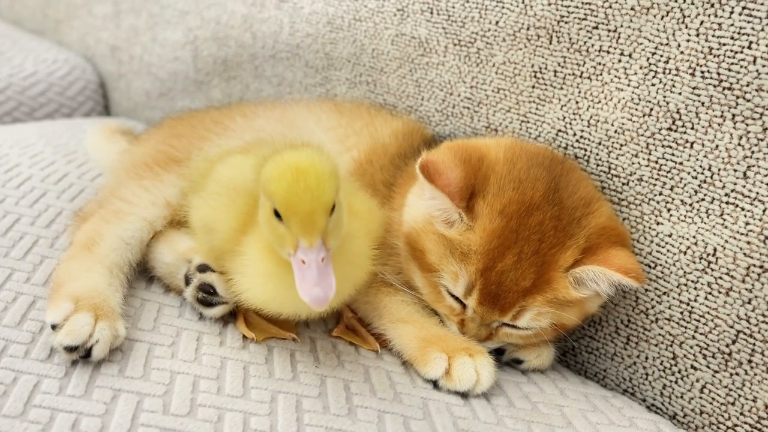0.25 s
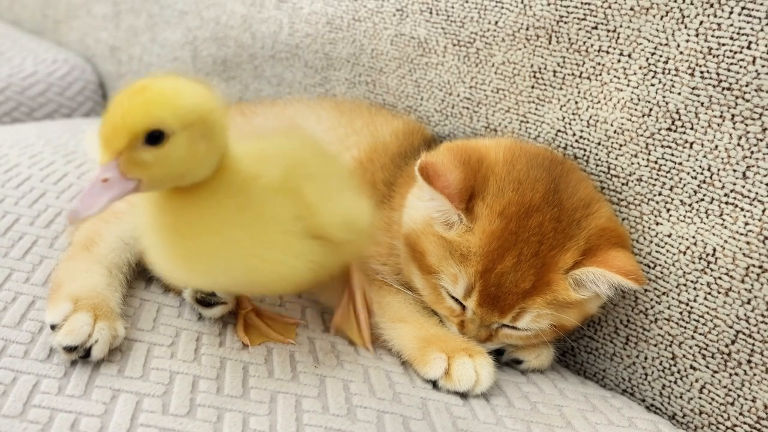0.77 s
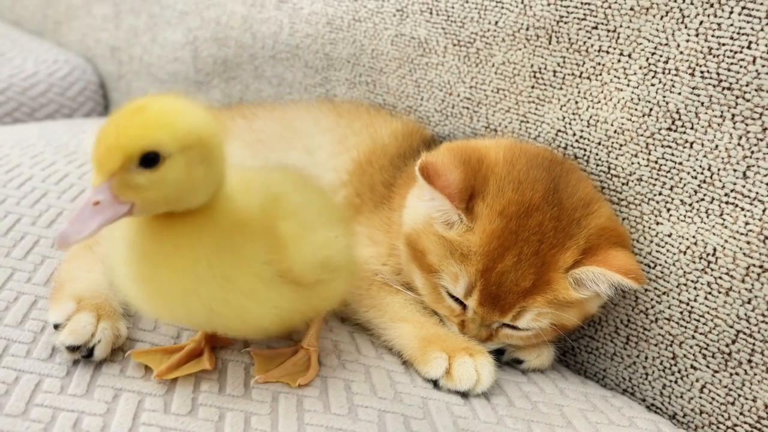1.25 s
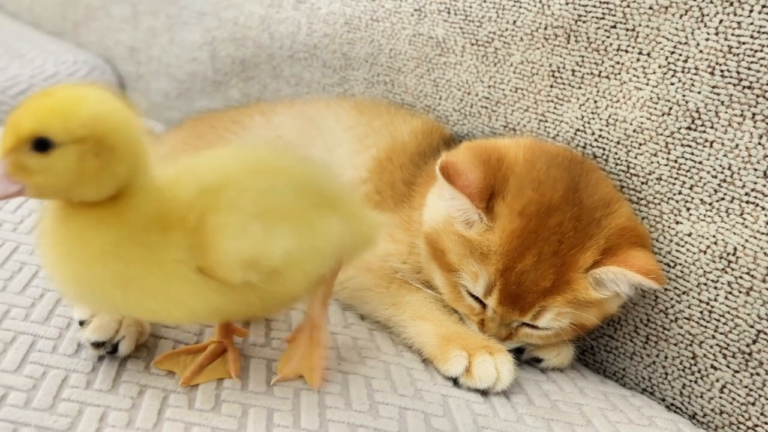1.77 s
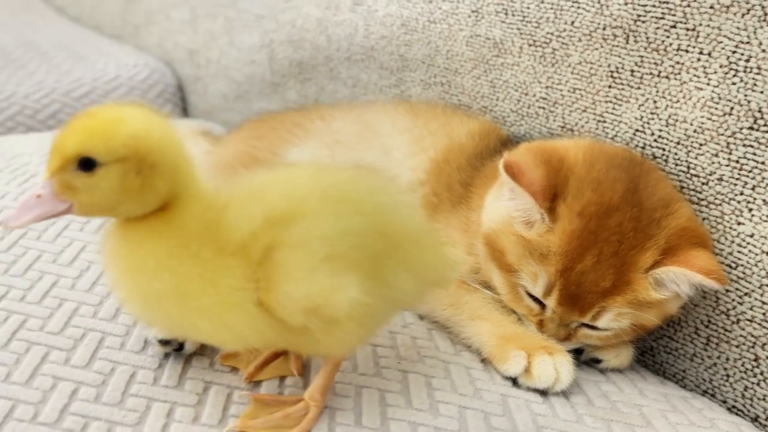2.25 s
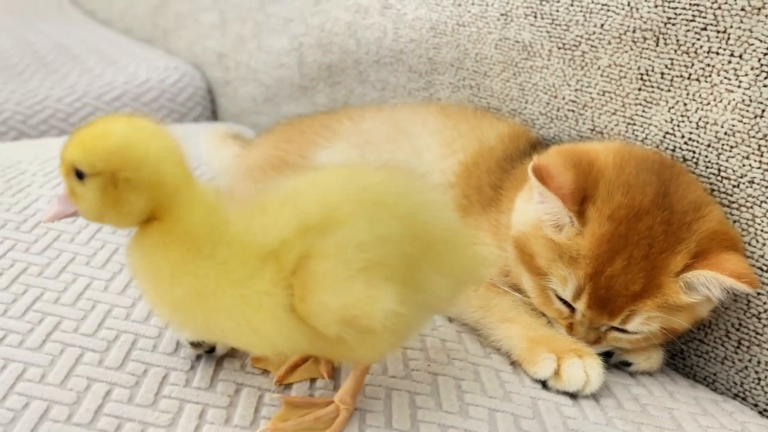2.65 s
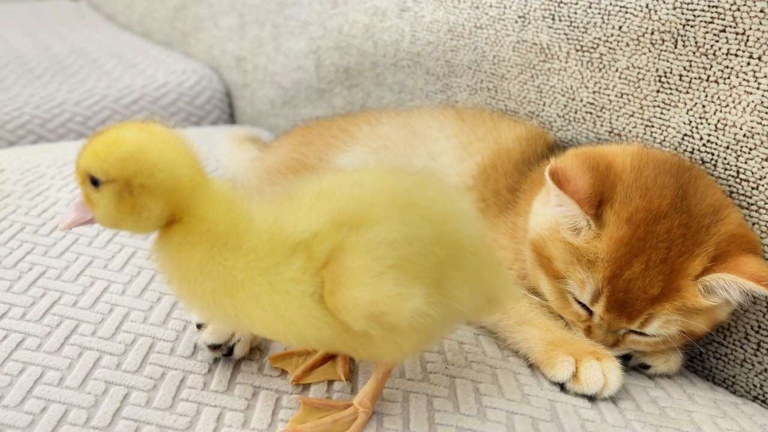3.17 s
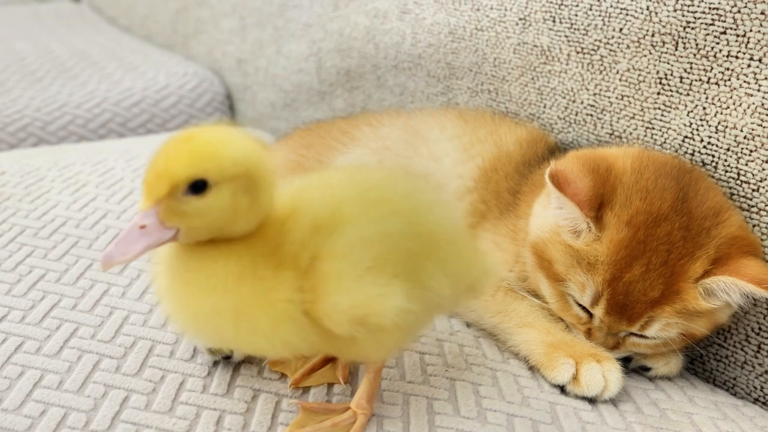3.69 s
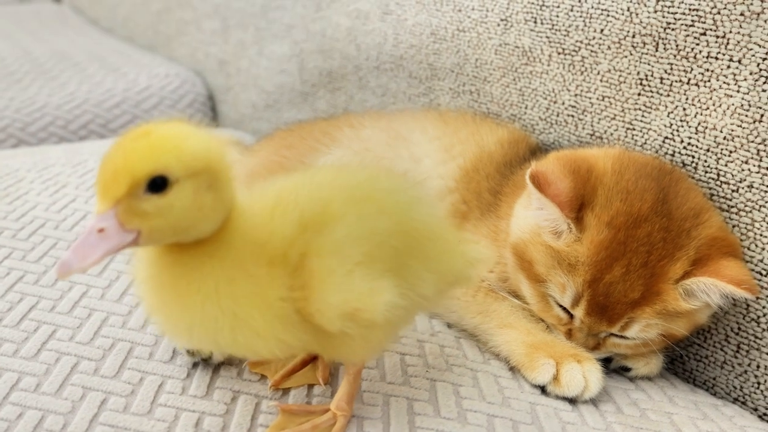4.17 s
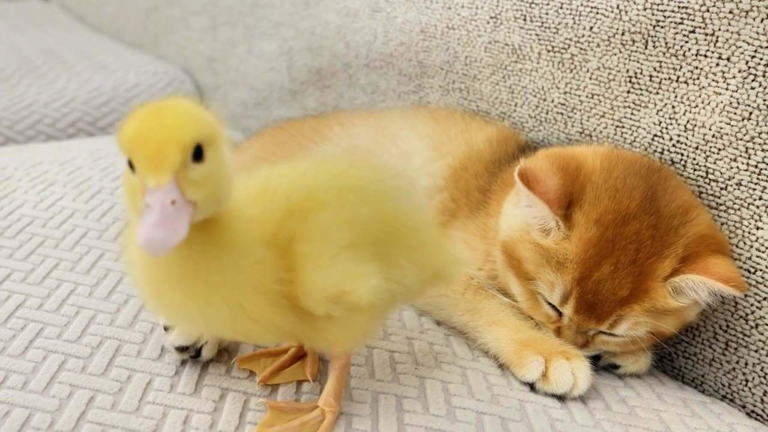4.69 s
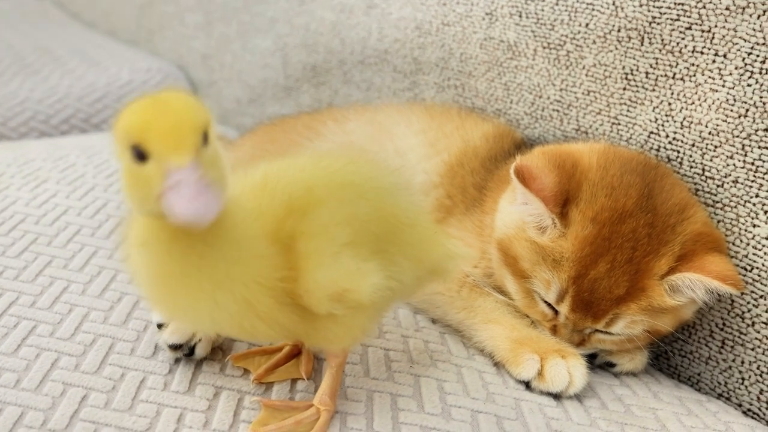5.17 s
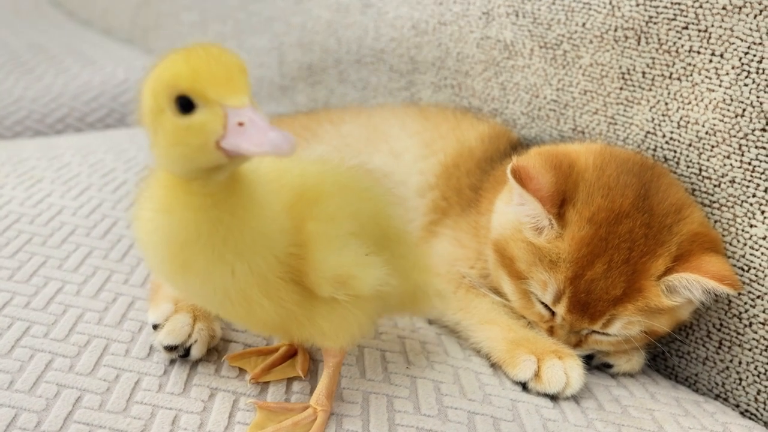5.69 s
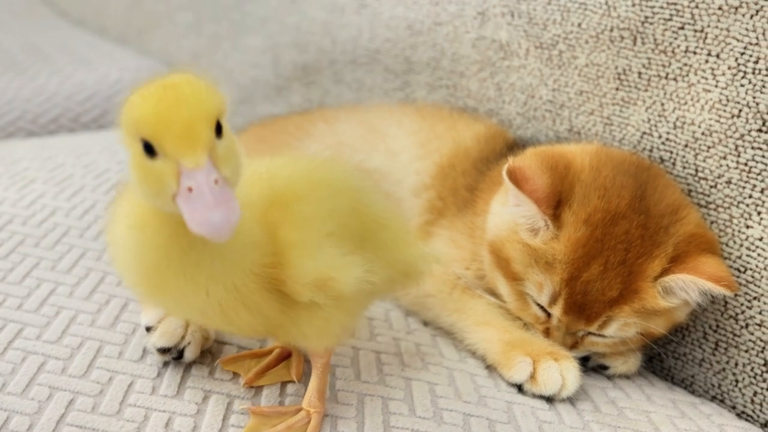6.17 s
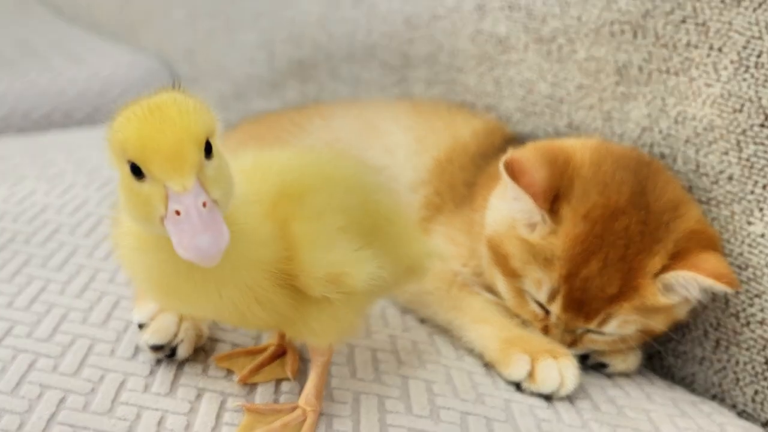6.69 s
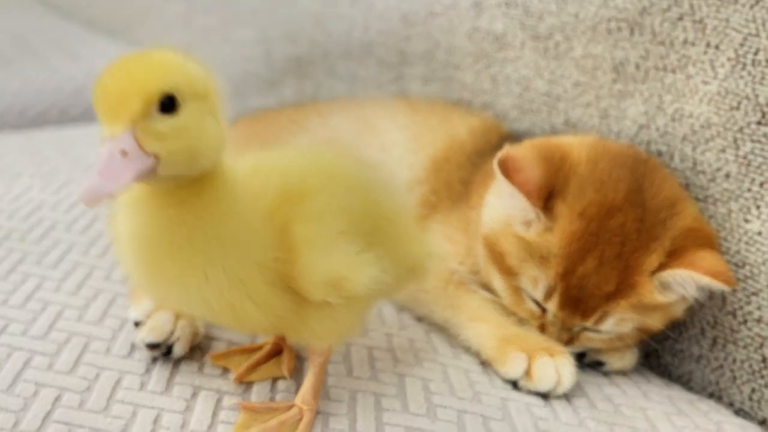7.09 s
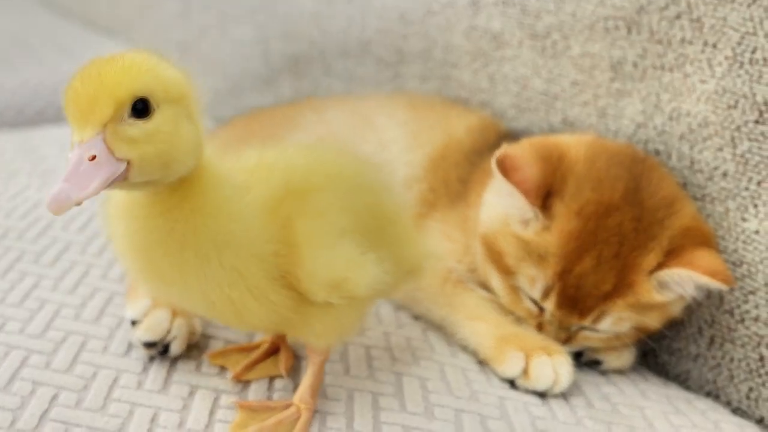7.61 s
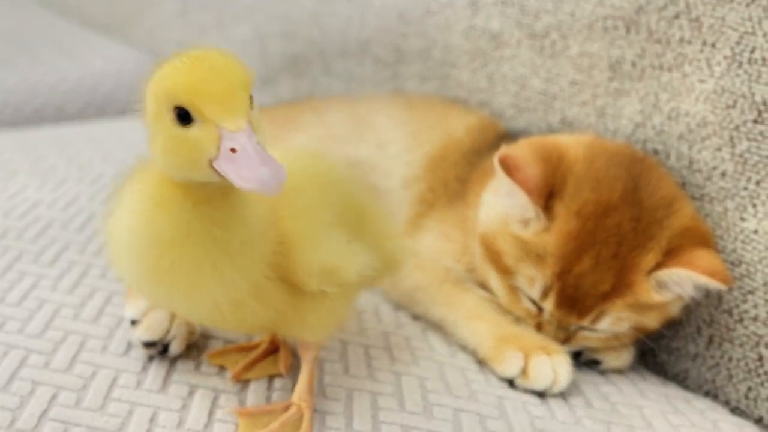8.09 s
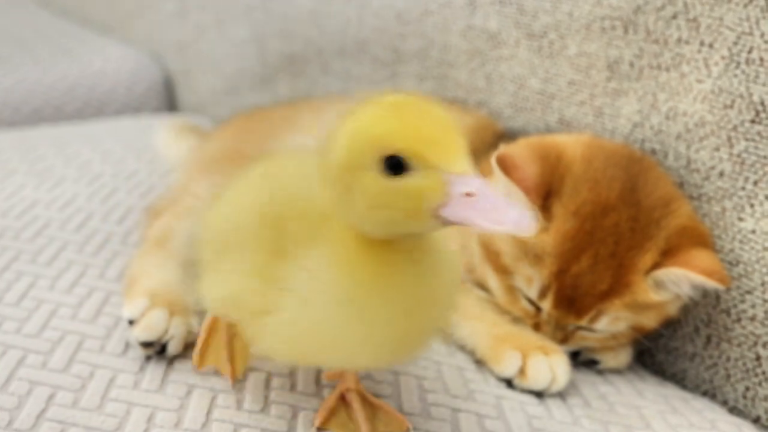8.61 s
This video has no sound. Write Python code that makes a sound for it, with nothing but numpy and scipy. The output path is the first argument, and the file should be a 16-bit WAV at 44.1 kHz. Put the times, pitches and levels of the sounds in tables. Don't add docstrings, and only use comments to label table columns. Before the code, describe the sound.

A close duckling peeps steadily in short high whistles, about five a second, over a faint kitten purr, with soft footsteps on a sofa cushion.

```python
import sys
import numpy as np
from scipy import signal
from scipy.fft import rfft, irfft
from scipy.io import wavfile

SR = 44100
rng = np.random.default_rng(int(sys.argv[2]) if len(sys.argv) > 2 else 0)


def wav_record(signal):
    frames = np.transpose(np.atleast_2d(signal))
    bounded = np.clip(frames, -1, 1)
    quanta = np.round(bounded * 32767).astype(np.int16)
    wavfile.write(sys.argv[1], SR, quanta)


def boost(x):
    u = np.asarray(x, float) / 20
    return 10 ** u


N = 390268

# start_s, length_s, peak_db, crest_hz, hump_hz
PEEPS = [(0.1043, 0.072, -17.5, 3458, 3210), (0.2921, 0.072, -17, 3413, 3275),
         (0.4859, 0.073, -17, 3405, 3215), (0.6696, 0.074, -18.5, 3445, 3120),
         (0.8605, 0.074, -20.5, 3286, 3040), (1.0661, 0.066, -20.5, 3257, 3070),
         (1.2518, 0.075, -19, 3266, 3014), (1.455, 0.073, -18.5, 3323, 3010),
         (1.6725, 0.069, -19.5, 3377, 3000), (1.859, 0.071, -21, 3230, 2925),
         (2.0556, 0.074, -21.5, 3350, 3046), (2.273, 0.074, -21, 3320, 2960),
         (3.6012, 0.026, -28.5, 3060, 2460), (3.7033, 0.049, -23.5, 3367, 2680),
                (3.916, 0.061, -21.7, 3375, 3085), (4.041, 0.06, -21.5, 3290, 2870),
                (4.2401, 0.067, -20.5, 3320, 3104), (4.4254, 0.07, -20.5, 3340, 3120),
                (4.6122, 0.077, -20.5, 3234, 3160), (4.789, 0.074, -18.5, 3385, 3166),
                (4.9811, 0.072, -18, 3448, 3244), (5.1638, 0.072, -18, 3420, 3185),
                (5.3369, .0781, -17.5, 3450, 3310), (5.5289, 0.073, -15.5, 3450, 3181),
                (5.7132, 0.077, -16, 3430, 3178), (5.9007, 0.076, -15.5, 3507, 3223),
                (6.0816, 0.078, -16.5, 3450, 3224), (6.274, 0.075, -16, 3480, 3264),
                (6.4711, 0.074, -15.5, 3403, 3190),
         (6.7688, 0.064, -18, 3389, 2836), (7.1479, 0.058, -19.5, 3514, 2712),
              (7.3314, 0.071, -18.5, 3350, 3144), (7.529, 0.068, -18.5, 3410, 3020),
              (7.7373, 0.072, -18.5, 3374, 3030), (7.9502, 0.07, -18, 3340, 3050),
              (8.1272, 0.074, -18, 3316, 3050), (8.3232, 0.072, -18, 3270, 3000),
              (8.533, 0.072, -21.5, 3160, 2823), (8.7557, .0709, -18, 3460, 2800)]
# time_s, dip_hz, split_hz (second membrane above first), twin_db, scoop_hz (rise into crest)
MEMBRANE_TENSION = [(.1, 2892, 190, -12.5, 157), (.6, 2870, 202, -7.5, 82), (1.0, 2689, 338, -9, -1),
                    (1.9, 2698, 351, -7.5, 41), (2.1, 2735, 265, -8.5, 68.5), (3.6, 2660, 302, -28, -49),
                    (3.9, 2594, 345, -10, 0), (4.04, 2818, 365, -11, -10), (4.25, 2685, 368, -8.5, 73),
                    (4.8, 2740, 354, -6, 80), (5.4, 2865, 331.5, -8.5, 22), (6.5, 2822, 343, -5.5, 33),
                    (7.15, 2586, 443, -10, -43), (7.35, 2709, 411, -6, 4), (7.95, 2655, 382, -7, -22),
                    (8.15, 2748, 362, -5, 6), (8.53, 2565, 440, -6, -16), (8.76, 2660, 325, -7.5, 1.5)]
# time_s, bright_db (4th overtone), crest_db, dip_db (both re peak)
HEAD_POSTURE = [(.1, -44, 0.5, -0.5), (.7, -64, -1.5, -1), (1.05, -58, -2.5, -1), (1.45, -54, -4.5, -4),
                (1.9, -47, -2, 0), (2.3, -38, -1, 2.5), (3.7, -45.5, -2.5, -4), (4.5, -35, 0, 0.5),
                (4.8, -25.5, 0, -2.5), (5.35, -27.5, -3.5, -1), (5.9, -25.5, -5, -2), (6.3, -21.5, -3, -3),
                (6.5, -27, -3.5, -5.5), (6.8, -26, -2.5, -4.5), (7.35, -28, -1.5, -3),
                (7.75, -30.5, -1, -3), (8.2, -30.5, -2.5, -4), (8.8, -46, -3, -3)]
# start_s, extra_db
VOICE_CRACKS = [
    (3.916, 9),
    (4.7889, -0.5),
    (5.1639, 6),
    (5.3375, 11.5),
    (5.9003, 3.5),
    (6.0818, 1),
    (7.7375, 7),
    (8.1272, 4),
]
# onset_db, crest_db, fall_db, dip_db, hump_db, end_db (re whistle)
OVERTONE_STAGES = [(-27.5, -18.5, -26.5, -35, -19.5, -31), (-41.5, -26, -40.5, -51.5, -28.5, -40),
                   (-36.5, -26, -46, -55, -39, -49), (-52.5, -51, -45.5, -38, -52, -52)]
BRIGHTNESS_SHARE = [0.15, 0.27, 0.77, 0.66]
# first_pulse_s, throat_hz
PURR_BREATHS = [(.021, 25.3), (.263, 23.25), (.86, 25.5), (1.375, 23.4), (1.891, 25.25), (2.453, 22.4),
                (2.94, 24.7), (3.512, 21.95), (4.038, 23.2), (4.652, 20.4), (5.282, 22.25), (5.916, 19.4),
                (6.583, 22.85), (7.243, 19.45), (7.904, 21.95), (8.459, 19.35)]
PURR_LEVELS = [-49, -49.5, -46, -48, -48.5, -49.5, -48.5, -51, -49, -51.5, -50.5, -52.5, -50, -51.5, -50.5,
               -53.5]
# mode_hz, mode_db, t60_s
THROAT_MODES = [(190, -13.5, 0.033), (306, 3.5, 0.016), (685, 2, 0.0037)]
OUT_BREATH_LEVELS = [-4, 0, 3]
# start_s, peak_db, pitch_hz, t60_s
FOOT_THUMPS = [
    (1.005, -42.5, 133, 0.078),
    (1.262, -31.5, 96, 0.075),
    (5.986, -40.5, 302, 0.051),
    (6.789, -41, 146, 0.18),
    (7.395, -29.5, 155, 0.015),
    (8.198, -43, 161.6, 0.14),
    (8.51, -26.5, 149, 0.034),
    (8.844, -31, 150, .05),
]
# start_s, length_s, level_db, top_hz
FOOT_SCUFFS = [
    (0.893, 0.19, -58.5, 1190),
    (1.887, 0.048, -51, 900),
    (7.389, 0.022, -49.5, 940),
    (1.894, 0.14, -45, 233),
    (2.028, 0.076, -52.5, 298),
    (2.526, 0.129, -53.5, 400),
    (8.514, 0.033, -47.5, 347),
]
# start_s, peak_db, top_hz
CLAW_TICKS = [
    (.952, -39, 3940),
    (1.6, -42, 4430),
    (2.559, -46, 2800),
    (2.715, -44, 2850),
    (4.876, -35.5, 8600),
    (5.396, -41, 2970),
]
# centre_s, pitch_hz, level_db
FAR_PEEPS = [(.19, 3815, -27.5), (4.38, 3640, -43), (4.901, 3750, -39), (5.149, 3750, -31.5),
             (5.45, 3820, -32.5), (5.648, 3800, -30), (5.85, 3760, -27.5), (6.05, 3810, -27),
             (6.38, 3830, -28.5), (6.549, 3800, -29), (6.818, 3800, -32), (7.02, 3900, -27.5),
             (7.249, 3870, -28), (7.46, 3980, -28), (7.681, 4050, -31.5), (7.83, 3840, -33),
             (8.0, 3930, -29.5), (8.229, 3850, -30.5), (8.42, 3850, -53), (8.599, 3900, -33.5)]
# freq_hz, density_db_per_hz
HUSH_SPECTRUM = [(20, -84.5), (62, -79), (120, -81), (300, -89), (500, -91.5), (800, -97), (1300, -101),
                 (2000, -104), (3300, -104.5), (6000, -108), (15000, -109.5)]

USUAL_LENGTH_S, USUAL_HUMP_HZ, USUAL_SPLIT_HZ = .072, 3050, 340
CREST_S, SCOOP_S_PER_KHZ = 0.0043, .025
DIP_S, DIP_STRETCH, LATEST_DIP_SHARE, DROP_SHARE = 0.03503, .2, .58, 0.252
END_HZ, TIRING_HZ_PER_S = 2370, 16
FALL_SHARE, SCOOP_STEEPENS_PER_KHZ = 0.418, 0.73
HUMP_DB, HUMP_DB_PER_KHZ = -4.5, 10
FALL_SPLIT, HUMP_SPLIT_HZ, SPLIT_LAG, SPLIT_KEPT = 0.812, 410, .6, 0.52
HUMP_TWIN_DB, MIRROR_DB, BRIGHT_REF_DB = -13.5, -24, -27.5
SHUT_CYCLES, REOPEN_CYCLES, JITTER_CYCLES = -.06, .33, .012
BREATH_EDGE_S, BREATH_EDGE_DB = 0.03, -7.5
TICK_DB = -7
ROOM_DB, ROOM_T60_S = -31.5, 0.75
MASK_DB, MASK_DB_PER_OCTAVE, MASK_LINGER_DB, MASK_CHANCE_DB = -17, 60, -5, 3


def at(s):
    return int(round(s * SR))


def along(curve, s):
    times, *columns = np.transpose(curve)
    return [np.interp(s, times, c) for c in columns]


def smooth_through(s, values, t):
    step = np.diff(s)
    slope = np.diff(values) / step
    left, right = slope[:-1], slope[1:]
    inner = np.where(left * right > 0, 2 * left * right / (left + right + 1e-9), 0)
    tangent = np.r_[2 * slope[0], inner, .45 * slope[-1]]
    k = np.clip(np.searchsorted(s, t) - 1, 0, len(step) - 1)
    u = (t - s[k]) / step[k]
    bend = (1 - u) * (tangent[k] - slope[k]) - u * (tangent[k + 1] - slope[k])
    return values[k] + step[k] * u * (slope[k] + (1 - u) * bend)


def ring(x, hz, t60_s):
    r = boost(-60 / (t60_s * SR))
    w = 2 * np.pi * hz / SR
    return signal.lfilter([0, np.sin(w)], [1, -2 * r * np.cos(w), r * r], x + 1e-18)


def band(x, low_hz, high_hz):
    y = signal.sosfilt(signal.butter(2, [low_hz, high_hz], "band", fs=SR, output="sos"), x)
    return y / np.std(y)


def noise(count, low_hz, high_hz):
    return band(rng.standard_normal(count), low_hz, high_hz)


def add(out, s, piece):
    piece = piece[:len(out) - at(s)]
    out[at(s):at(s) + len(piece)] += piece


def duckling():
    out = np.zeros(N)
    for s, length_s, peak_db, crest_hz, hump_hz in PEEPS:
        dip_hz, split_hz, twin_db, scoop_hz = along(MEMBRANE_TENSION, s)
        bright_db, crest_db, dip_db = along(HEAD_POSTURE, s)
        push_hz = hump_hz - USUAL_HUMP_HZ
        crest_s = CREST_S + SCOOP_S_PER_KHZ * max(scoop_hz, 0) / 1000
        dip_s = min(DIP_S + DIP_STRETCH * (length_s - USUAL_LENGTH_S), LATEST_DIP_SHARE * length_s)
        hump_s = (1 - DROP_SHARE) * length_s
        stage_s = s + np.array([0, crest_s, (crest_s + dip_s) / 2, dip_s, hump_s, length_s])
        fall_share = FALL_SHARE - SCOOP_STEEPENS_PER_KHZ * scoop_hz / 1000
        fall_hz = dip_hz + fall_share * (crest_hz - dip_hz)
        end_hz = min(END_HZ - TIRING_HZ_PER_S * s, hump_hz - 100)
        stage_hz = np.array([crest_hz - scoop_hz, crest_hz, fall_hz, dip_hz, hump_hz, end_hz])
        hump_db = HUMP_DB + HUMP_DB_PER_KHZ * push_hz / 1000
        effort_db = peak_db + np.array([crest_db, 0, dip_db, hump_db])
        hump_split_hz = HUMP_SPLIT_HZ - SPLIT_LAG * push_hz + SPLIT_KEPT * (split_hz - USUAL_SPLIT_HZ)
        split = FALL_SPLIT * split_hz, split_hz, hump_split_hz
        crack_db = sum(extra_db for onset_s, extra_db in VOICE_CRACKS if abs(onset_s - s) * 20 < 1)
        add(out, s, peep(stage_s, stage_hz, effort_db, split, twin_db, bright_db, crack_db))
    return out


def peep(s, hz, effort_db, split, twin_db, bright_db, crack_db):
    s = s + [0, 0, 0, 0, 0, .002]
    hz = hz - [0, 0, 0, 0, 0, 70]
    t = np.arange(at(s[0]), at(s[-1])) / SR
    since_s = t - s[0]
    fall_hz, dip_hz, hump_hz = split
    above_hz = smooth_through(s, np.array([90, 0.57 * fall_hz, fall_hz, dip_hz, hump_hz, hump_hz]), t)
    share_db = np.array([-36, -30, twin_db, twin_db, HUMP_TWIN_DB - 2.0, -44])
    share = boost(smooth_through(s, share_db, t))
    beat = np.exp(2j * np.pi * (np.cumsum(above_hz) / SR + rng.random()))
    turns = np.cumsum(smooth_through(s, hz, t)) / SR
    whistle = np.exp(2j * np.pi * turns)
    haze = signal.hilbert(noise(len(t), 150, 550))
    haze = haze * boost(np.interp(t, s, [-40, -27.5, -29.5, -29.5, -38.5, -42.5]))
    mirrored = beat + boost(MIRROR_DB) / beat + boost(-7.5) * share * beat ** 2
    voice = whistle * (1 + share * mirrored + haze)
    rasp = noise(len(t), 40.2, 450)
    bright_more_db = bright_db - BRIGHT_REF_DB
    for k, (stage_db, facing) in enumerate(zip(OVERTONE_STAGES, BRIGHTNESS_SHARE), 2):
        mixed = 1 + share * (9.6 / k ** 2 * beat + 0.21 * k * rasp + 1.7 * share * beat ** 2)
        mixed *= np.minimum(1, since_s / (0.001 * k))
        level = boost(np.interp(t, s, stage_db) + facing * bright_more_db)
        voice += level * whistle ** k * mixed
    catch = np.exp(-((since_s - .008) / 0.0079) ** 2) * boost(crack_db - 1.5)
    halves = sum(np.sin(np.pi * k * turns) for k in range(1, 8, 2))
    voice = voice.imag + boost(-43.5 + 1.6 * bright_more_db) * catch * rasp * halves
    puff = boost(-36) * noise(len(t), 1800, 4100) * catch
    hiss = boost(bright_db - 21) * noise(len(t), 14000, 16000)
    onset_db = effort_db[0] - 3.0 - .02 * max(hz[1] - hz[0], 0)
    height = smooth_through(s, boost(np.r_[onset_db, effort_db, -40]), t)
    opening = np.sin(np.pi / 2 * np.minimum(1, since_s / .0015)) ** 2
    closing = np.minimum(1, (s[-1] - t) / 0.007)
    return height * opening * closing * (voice + puff + hiss)


def purr():
    clicks = np.zeros((2, N + SR))
    ends_s = [row[0] for row in PURR_BREATHS[1:]] + [N / SR]
    for k, ((s, rate_hz), level_db, end_s) in enumerate(zip(PURR_BREATHS, PURR_LEVELS, ends_s)):
        whole = np.arange(int((end_s - s) * rate_hz + .5))
        for part, part_db in ((SHUT_CYCLES, 7.0), (SHUT_CYCLES + REOPEN_CYCLES, 5.0)):
            chance = rng.standard_normal((len(whole), 2))
            when_s = s + (whole + part + JITTER_CYCLES * chance[:, 0]) / rate_hz
            turning = np.exp(-(when_s - s) / BREATH_EDGE_S) * (s > .1)
            turning = turning + np.exp((when_s - end_s) / (4.5 * BREATH_EDGE_S))
            pulse_db = level_db + part_db + BREATH_EDGE_DB * turning + 2.5 * chance[:, 1]
            clicks[k % 2, (when_s * SR).astype(int)] = boost(pulse_db)
    fur = signal.butter(4, [150, 950], "band", fs=SR, output="sos")
    soft_in, soft_out = signal.sosfilt(fur, clicks[:, :N] + 1e-18)
    out = np.zeros(N)
    for (hz, mode_db, t60_s), out_db in zip(THROAT_MODES, OUT_BREATH_LEVELS):
        out += boost(mode_db) * ring(soft_in + boost(out_db) * soft_out, hz, t60_s)
    return out


def feet():
    out = np.zeros(N)
    for s, peak_db, hz, t60_s in FOOT_THUMPS:
        push = np.r_[np.diff(np.hanning(at(.004))), np.zeros(at(.2))]
        knock = np.r_[np.hanning(at(.0008)), np.zeros(len(push) - at(.0008))]
        body = ring(push, hz, t60_s) + boost(-33.5) * ring(knock, 3.8 * hz, 0.28 * t60_s)
        add(out, s - .001, boost(peak_db) * body / np.abs(body).max())
    for s, length_s, level_db, top_hz in FOOT_SCUFFS:
        count = at(length_s)
        grit = rng.standard_normal(count) * (rng.random(count) < .01)
        dull = signal.lfilter([1], [1, -.95], grit + 1e-9)
        add(out, s, boost(level_db) * signal.windows.tukey(count, .3) * band(dull, 110, top_hz))
    for s, peak_db, top_hz in CLAW_TICKS:
        snap = noise(at(.006), 500, top_hz) * np.exp(-np.arange(at(.006)) / at(0.0029))
        add(out, s, boost(peak_db + TICK_DB) * snap)
    return out


def far_duckling():
    out = np.zeros(N)
    u = np.arange(at(.09)) / at(.09)
    for s, hz, level_db in FAR_PEEPS:
        glide = np.sin(2 * np.pi * np.cumsum(hz * (1.045 - 0.088 * u)) / SR)
        hoarse = 1.7 + noise(len(u), 30, 260)
        add(out, s - .03, boost(level_db - 5.0) * np.sin(np.pi * u) * hoarse * glide)
    return out


def room(near, far):
    t = np.arange(at(1.5)) / SR
    lead = at(.19)
    echoes = noise(len(t), 2400, 4800) * boost(-60 * t / ROOM_T60_S) * np.minimum(1, t / 0.0092)
    wet = signal.fftconvolve(np.r_[near[:lead], near + far], echoes / np.linalg.norm(echoes))
    return boost(ROOM_DB) * wet[lead:lead + N]


def hush():
    hz = np.fft.rfftfreq(N, 1 / SR) + 1
    knots_hz, knots_db = np.transpose(HUSH_SPECTRUM)
    gain = boost(np.interp(np.log(hz), np.log(knots_hz), knots_db)) * np.sqrt(SR / 2)
    return irfft(rfft(rng.standard_normal(N)) * gain, N)


def scene():
    near = duckling()
    return (near + purr() + feet() + room(near, far_duckling()) + hush())[None]


def masked(x):
    hz, _, cells = signal.stft(x, SR, nperseg=1024)
    bands = cells[:512].reshape(64, 8, -1)
    level_db = 10 * np.log10(np.mean(np.abs(bands) ** 2, axis=1) + 1e-20)
    slope_db = MASK_DB_PER_OCTAVE * np.log2(hz[4:512:8, None])
    cover_db = np.maximum.accumulate(level_db + slope_db, axis=0) - slope_db + MASK_DB
    cover_db = np.maximum(cover_db, np.roll(cover_db, 1, axis=1) + MASK_LINGER_DB)
    margin_db = level_db - cover_db + MASK_CHANCE_DB * rng.standard_normal(level_db.shape)
    kept = np.where(hz[:512:8, None] > 3000, np.clip(.5 + margin_db / 2, .03, 1), 1)
    thinned = (bands * kept[:, None]).reshape(512, -1)
    return signal.istft(np.r_[thinned, cells[512:]], SR)[1][:N]


def band_limit(x):
    return signal.sosfilt(signal.butter(12, 16500, fs=SR, output="sos"), x)


def record(dry):
    top_cut = signal.cheby2(12, 60, 16300, fs=SR, output="sos")
    mix = signal.sosfilt(top_cut, masked(dry[0]))[None]
    return band_limit(mix)


dry = scene()
out = record(dry)
wav_record(out)
```